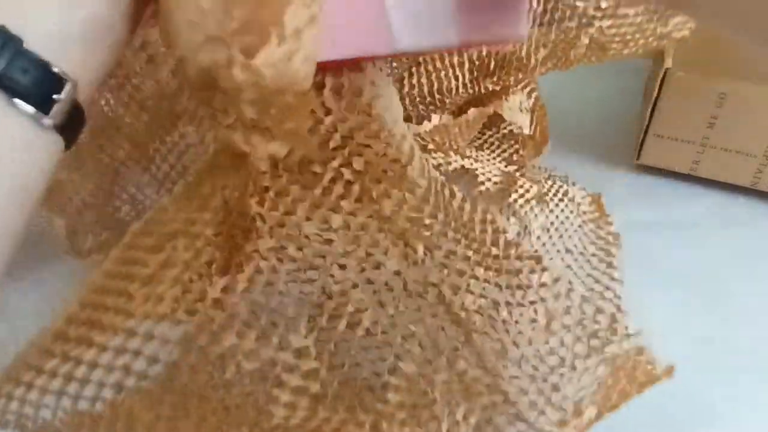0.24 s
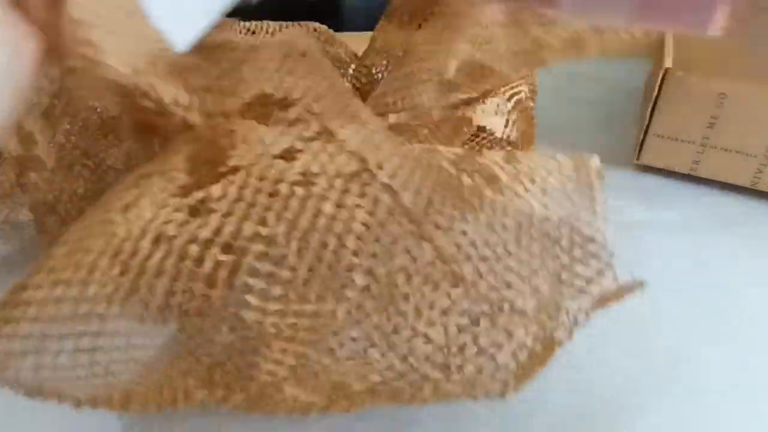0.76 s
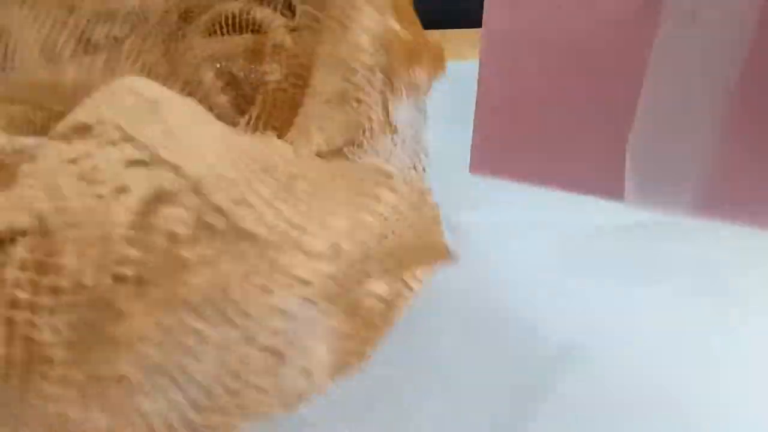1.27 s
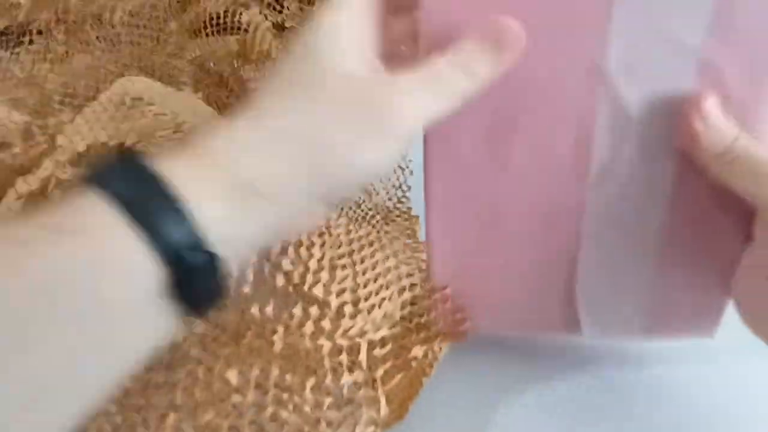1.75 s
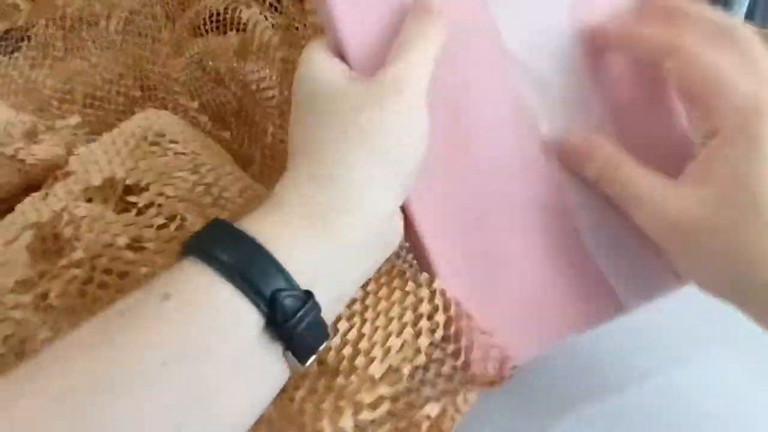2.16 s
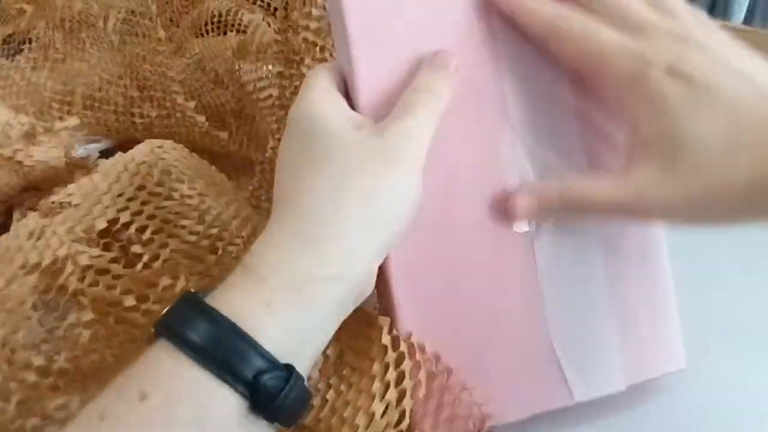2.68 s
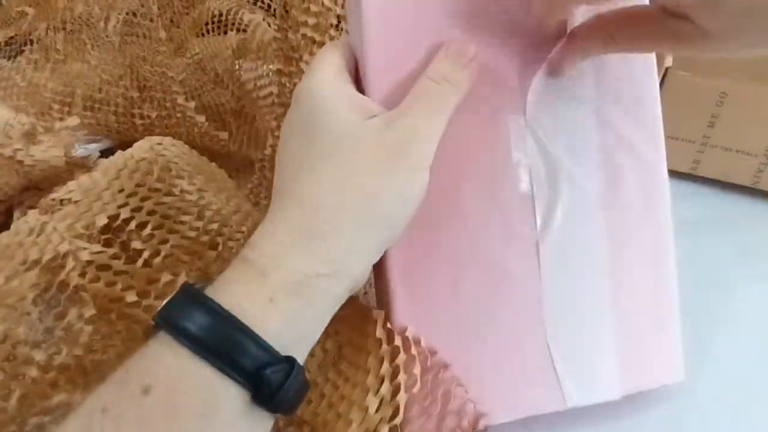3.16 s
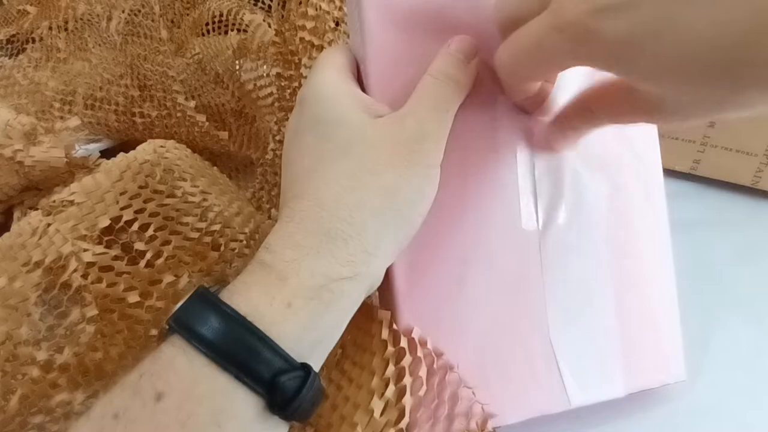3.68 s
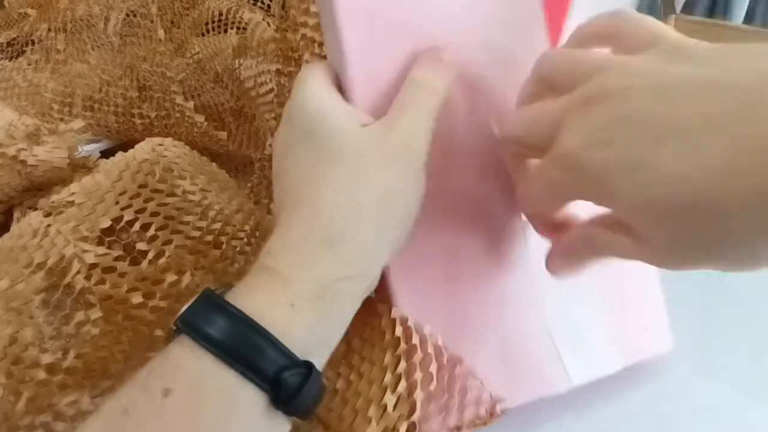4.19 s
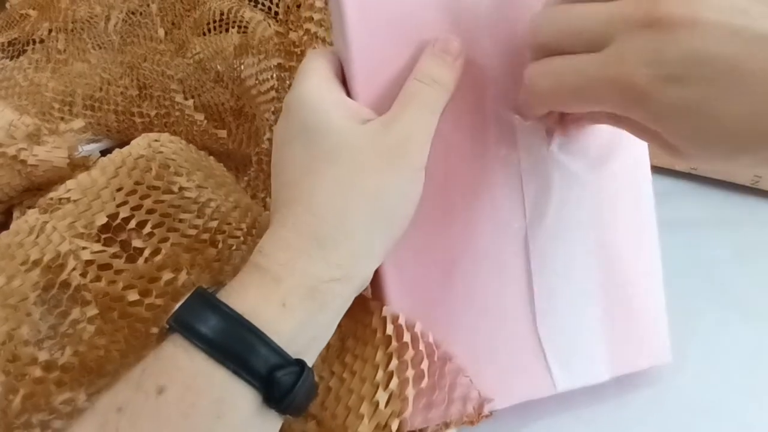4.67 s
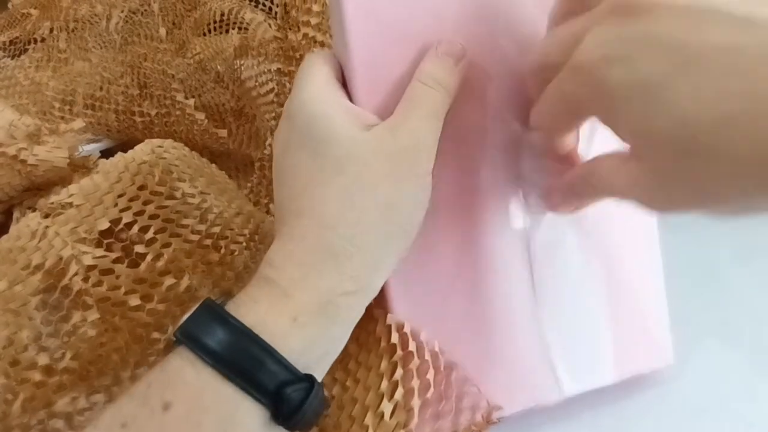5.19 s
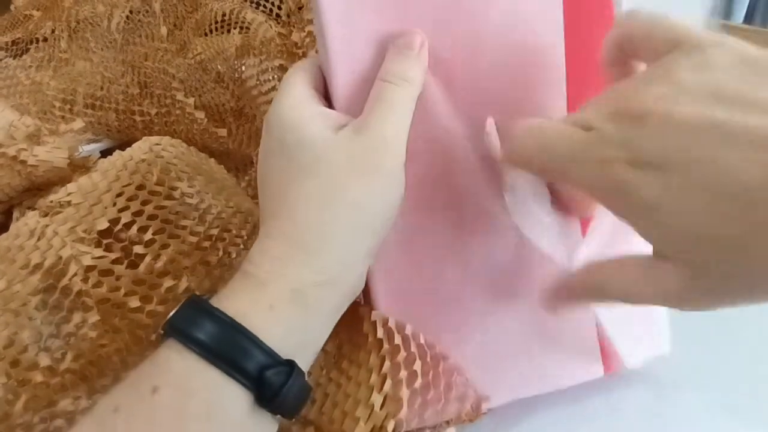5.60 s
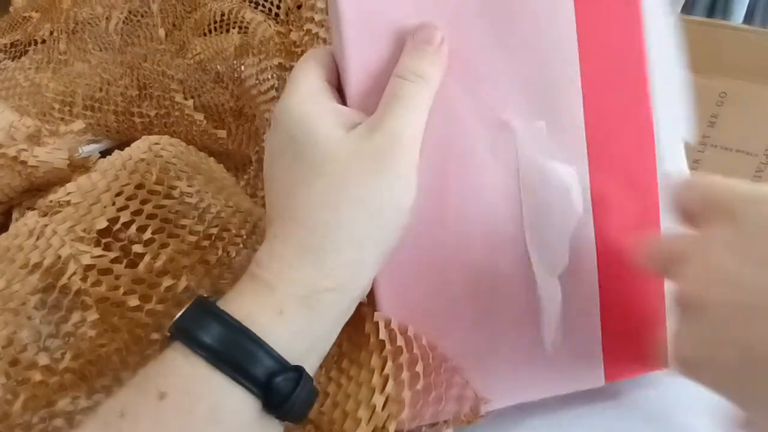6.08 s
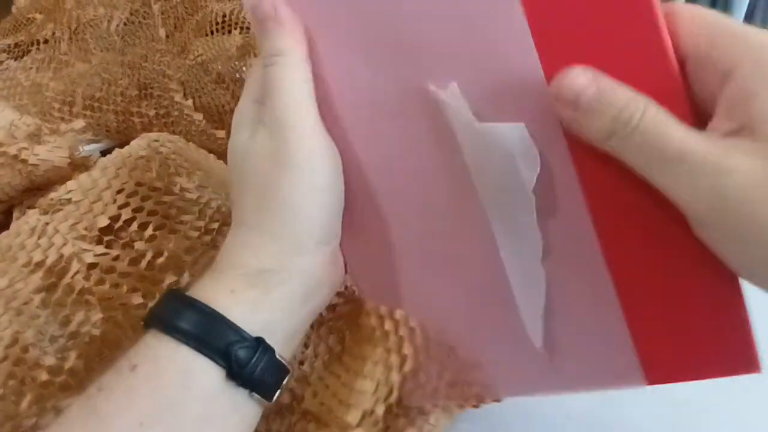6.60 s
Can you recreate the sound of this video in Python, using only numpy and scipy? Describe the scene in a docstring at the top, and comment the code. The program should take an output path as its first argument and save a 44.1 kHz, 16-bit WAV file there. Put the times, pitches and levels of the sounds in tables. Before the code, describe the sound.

Faint papery brushing and a soft thump give way to brittle tissue crinkling and ripping over a hollow cardboard box, ending in light finger rubs.

```python
"""Fingers pick at the taped tissue wrapping of a flat box and tear it open, pull by pull: random showers of
snapping fibres swell, slacken and die away, single creases pop as resonant noise bursts, and the hollow box drums along.
Before this the box is lifted out of honeycomb packing paper, a wider shower of snaps, and bumps softly onto a table.
Knocks, bumps and a tap on the card cover ring sets of modes; a phone close by in a small room hears it over faint hiss."""
import sys
import numpy as np
from scipy import signal
from scipy.fft import rfft, irfft
from scipy.io import wavfile
from scipy.ndimage import uniform_filter1d

SR = 44100
rng = np.random.default_rng(int(sys.argv[2]) if len(sys.argv) > 2 else 0)


def transcribe(u):
    """Save the signal u as a 16-bit wav file named by the first command-line argument.

    u: samples, shape (n,) or (channels, n), limited to [-1, 1]; the rate is SR.
    q: integer samples, one column per channel.
    """
    v = np.clip(np.atleast_2d(u).T, -1, 1)
    q = np.round(v * 32767).astype(np.int16)
    wavfile.write(sys.argv[1], SR, q)


N = 302071
TIME = np.arange(N) / SR

# Pulls and rubs at the tissue: (start [s], length [s], relative rustle level [dB], relative fibre fizz level [dB],
# relative box drumming level [dB], pitch of the taut span [Hz], its relative ring [dB])
PULLS = [(2.826, 0.056, -43.5, -63, -68, 1100, 13), (2.88, .085, -47, -52, -50, 4270, 13),
         (3.05, 0.16, -53, -54, -55.5, 3450, 7), (3.138, 0.012, -33, -40, -45, 5030, 0.5),
         (3.24, 0.035, -34.5, -55, -58, 4460, 3), (3.33, 0.079, -35.5, -51, -50, 4660, 7.5),
         (3.42, 0.048, -45, -66, -51.5, 3600, 10), (3.522, .18, -35.5, -57, -46, 3300, 12),
         (3.76, 0.11, -35.5, -49, -43.5, 2380, 3), (3.94, 0.17, -38, -48.5, -50, 4270, 3),
         (4.235, .15, -49, -70, -48, 1750, 13), (4.335, 0.048, -42, -67, -43.5, 3400, -3),
         (4.42, 0.097, -47, -75, -54.5, 2730, 19), (4.525, 0.037, -31.5, -38, -49, 3200, 5),
         (4.57, 0.12, -30, -45, -44, 2660, 0), (4.725, 0.08, -46, -69, -56.5, 2450, 9),
         (4.86, 0.021, -36.5, -56, -52, 2470, 6), (4.935, 0.13, -34.5, -55, -44.5, 2460, 4),
         (5.03, 0.12, -37.5, -40, -64, 4030, 7), (5.165, 0.045, -26, -34, -41, 5500, 9),
         (5.198, 0.062, -25.5, -32, -52, 3220, 2), (5.265, .15, -34, -48.5, -53.5, 5100, 3),
         (5.41, .18, -29.5, -41, -47, 2150, -0.5), (5.638, 0.06, -24, -31.5, -47.5, 4970, 5),
         (5.7, 0.05, -28, -38, -56, 1400, -10), (5.785, 0.15, -31.5, -37.5, -51, 2300, 2.5),
         (5.928, 0.059, -25, -42, -40.5, 940, 6.5), (6.03, 0.063, -45, -46.5, -56, 950, 15),
         (6.128, 0.026, -42, -47, -83, 1110, 7), (6.4, 0.053, -47, -51, -56.5, 3030, 1)]
# Spectral colour of tissue: (frequency [Hz], relative gain [dB])
TISSUE_COLOUR = [(40, -12), (100, -5), (200, -5), (420, -2), (560, -3.5), (960, 0), (1500, 1.5), (1750, 3),
                 (2200, 1.5), (2750, 0), (3250, -0.5), (4000, -1), (5600, 0.5), (7000, -2), (8400, -18.5),
                 (10500, -1.5), (11500, -8.5), (12800, -9), (15200, -11.5)]
# Loudest creases popping: (start of the strain [s], relative pop level [dB], relative fibre fizz level [dB],
# facet pitch [Hz], time scale of the burst [ms])
CREASES = [(.2483, -36, -36, 5790, 2), (0.4047, -25.5, -23, 6200, 6.7), (.946, -65, -33, 13700, 18),
           (1.621, -27.5, -32.5, 3830, 7.8), (1.995, -40.5, -39, 6400, 12), (2.828, -26.5, -52, 3270, 7.6),
           (2.8396, -24, -28.5, 5700, 2.9), (2.846, -25, -36, 3300, 4.1), (2.855, -26.5, -36, 4440, 6.8),
           (2.8739, -31.5, -31, 3410, 1.5), (2.934, -29.5, -23, 5360, 6.2), (3.07, -38, -36, 3500, 7.5),
           (3.104, -29.5, -24, 5630, 4.8), (3.2408, -21, -41, 5970, 3), (3.2461, -24, -35, 5200, 3.4),
           (3.2632, -21, -25, 5600, 2.9), (3.298, -27, -43, 3660, 3.2), (3.327, -22.5, -22, 4370, 2.8),
           (3.529, -22, -47, 4120, 2), (3.5347, -25, -48, 2510, 1.1), (3.571, -25.5, -39, 2310, 5.7),
           (3.705, -23.5, -24, 5460, 8.2), (3.746, -22, -25, 4500, 3.2), (3.765, -17.5, -26.5, 2360, 2.1),
           (3.811, -24, -47, 3950, 3.3), (3.826, -25, -34, 4270, 3.5), (3.835, -19.5, -25.5, 4840, 5.1),
           (3.889, -21.5, -54, 2340, 8.7), (3.896, -36, -49, 2400, 2.2), (3.9372, -15, -16.5, 2440, 6.8),
           (3.96, -30, -20.5, 5510, 2.8), (4.075, -21, -25, 3670, 2.9), (4.303, -30.5, -41, 3740, 1.7),
           (4.3125, -27.5, -46, 3500, 3.8), (4.3223, -31, -56, 3700, 2.4), (4.343, -21.5, -30, 3310, 6.8),
           (4.386, -32, -61, 3410, 0.75), (4.5342, -20, -23.5, 3170, 2.5), (4.5896, -18.5, -27, 2570, 1.6),
           (4.65, -24, -34, 2020, 4.4), (4.6682, -22, -32, 4030, 3.4), (4.6857, -23.5, -26, 3140, 2.1),
           (4.7516, -26.5, -30.5, 5500, 2.5), (4.9191, -16.5, -59, 2330, 5.1),
           (4.966, -18, -27.5, 2380, 3.4), (5.0307, -12.5, -14.5, 3710, 5.9), (5.0771, -21, -21, 6650, 3.7),
           (5.1326, -24.5, -21, 6600, 0.96), (5.225, -18.5, -25, 5660, 2.8),
           (5.2429, -20, -21.5, 5500, 5.9), (5.334, -21.5, -25, 5900, 2.4), (5.3655, -21, -25, 2080, 1.4),
           (5.3824, -20.5, -24, 6030, 1.8), (5.409, -22, -25, 2130, 3.1), (5.4402, -20.5, -23.5, 4600, 3.9),
           (5.4684, -19.5, -22, 1840, 3.2), (5.4915, -34, -23.5, 6700, 3.2),
           (5.523, -24.5, -25.5, 2000, 5.7), (5.5501, -20.5, -42, 3500, 1.5),
           (5.5808, -23.5, -30, 5500, 2.6), (5.7802, -18.5, -21.5, 5240, 2.5),
           (5.863, -20.5, -20, 5010, 2.4), (5.8755, -18.5, -14.5, 6820, 2.1),
           (5.934, -23.5, -20, 2310, 9.7), (6.1579, -25.5, -20.5, 5940, 5.1),
           (6.4951, -37, -33.5, 2880, 8.9)]
# Spectral colour of a crease: (frequency [Hz], relative gain [dB])
CREASE_COLOUR = [(200, 10), (600, -4), (1000, 2.5), (1700, 1), (2400, 3), (6000, 3), (8300, -8.5),
                 (10300, 4.5), (13300, -4), (15300, -5.5), (16800, -25)]
# Brushes against the honeycomb paper: (start [s], length [s], relative rustle level [dB],
# relative fibre fizz level [dB], relative box drumming level [dB], pitch of the taut span [Hz], its relative ring [dB])
BRUSHES = [(.03, 0.22, -44, -43, -50.5, 2870, 8), (.087, 0.071, -32.5, -31, -54, 4700, -2),
           (.2, 0.064, -38.5, -53, -62, 4240, 0), (.28, .16, -41, -41.5, -52, 3140, 3),
           (.56, 0.19, -54.5, -41.5, -72, 4260, 0.5), (.77, 0.078, -54, -47, -87, 2210, 11),
           (.83, 0.13, -57, -44, -92, 4300, 3), (.96, 0.086, -53.5, -43, -84, 1900, 14),
           (1.02, 0.15, -49, -41, -91, 3300, 3), (1.07, .09, -58, -54, -83, 1400, -9),
           (1.15, 0.12, -44.5, -39, -61.5, 825, 4), (1.435, 0.014, -62, -50, -50, 1100, -1),
           (1.617, 0.022, -38, -71, -35.5, 1700, 0), (1.745, 0.082, -59.5, -50.5, -52.5, 4300, 9),
           (1.935, 0.05, -55.5, -41, -75, 5540, 5), (2.005, 0.089, -57.5, -46, -77, 3500, 9),
           (2.17, 0.062, -65, -48, -56.5, 5000, 2)]
# Spectral colour of the honeycomb mesh: (frequency [Hz], relative gain [dB])
MESH_COLOUR = [(40, -10), (110, -17), (200, -3), (330, -7), (520, -9), (760, 2.5), (1250, -2), (2100, 2.5),
               (3300, 3.5), (5800, 7), (8200, -2.5), (9300, 7), (10500, 14.5), (13300, 10), (15200, 7.5)]
# Fingertips sliding over the box: (start [s], length [s], relative rustle level [dB],
# relative fibre fizz level [dB], relative box drumming level [dB], pitch of the rubbed span [Hz], its relative ring [dB])
RUBS = [(2.752, 0.021, -40, -39.5, -84, 3360, 11), (2.9, 0.16, -52.5, -68, -55, 980, 36),
        (3.033, 0.04, -46.5, -63, -79, 1070, 28), (6.49, 0.21, -50.5, -54.5, -74, 2900, 6),
        (6.715, 0.15, -39.5, -43, -84, 2570, 9), (6.19, 0.46, -60.5, -51.5, -68, 3000, 0)]
# Modes of the card cover at pitch 1: (frequency [Hz], relative level [dB], t60 [s])
COVER_MODES = [(636, 9.5, 0.051), (1822, 6.5, 0.12), (2740, 4, 0.11), (3040, 16, 0.085), (4100, -3, .05),
               (724, -2.5, 0.11)]
# Fingers knocking on the box: (time [s], relative level [dB], pitch [multiple of the box's modes])
KNOCKS = [(1.444, -27.5, 1.06), (1.631, -30.5, 1.0), (2.282, -41.5, 1.05), (3.036, -37.5, 1.0),
          (3.248, -30.5, 1.0), (3.297, -31.5, 1.0), (3.478, -33.5, 1.0), (3.94, -29, .8),
          (4.167, -28.5, 1.05), (4.179, -30, 1.05), (5.033, -29, .92), (5.655, -27, .85),
          (6.411, -45, 1.05)]
# Modes of the hollow box at pitch 1: (frequency [Hz], relative level [dB], t60 [s])
BOX_MODES = [(233.5, -15, 0.19), (330, 4, 0.023), (358, 3.5, 0.068), (395, 1, 0.089), (440, 0.5, 0.016),
             (903, -11, 0.063), (860, -10, 0.088)]
# The box set down on the table: (time [s], relative level [dB], pitch [Hz])
BUMPS = [(2.375, -24.5, 90.6), (2.438, -31.5, 73)]
# Modes of the box lying on the table: (frequency [multiple of the bump's pitch], relative level [dB], t60 [s])
TABLE_MODES = [(.43, -15, 0.96), (.78, -13, 0.74), (1, 10, 0.16), (1.219, -14, 0.52)]
# The gripped box swaying under the pulls: (time of the height [s], relative level [dB], pitch [Hz], swell [ms])
THUDS = [(4.437, -39.5, 56, 17), (4.643, -34, 125, 7), (4.685, -31.5, 77.5, 9.7), (4.752, -36, 71.5, 20),
         (4.833, -41, 111, 15), (4.931, -32.5, 108, 8.3), (5.53, -37, 88, 15), (5.644, -31, 208, 6.1),
         (5.744, -34.5, 90, 9.4), (5.85, -37, 90, 13), (5.876, -32, 101, 7.9), (5.948, -36.5, 78, 17),
         (5.953, -36, 165, 16), (5.987, -36, 95, 15)]
# Spectral colour of the steady noise: (frequency [Hz], relative density [dB per Hz])
HISS_COLOUR = [(25, 17.5), (90, 13), (200, 7.5), (400, -17), (700, -44), (2500, -15), (5000, 4), (8000, -1),
               (10000, -30), (11400, 17), (13000, -13), (15200, -42)]
# Spectral colour of the microphone: (frequency [Hz], relative gain [dB])
MIC_COLOUR = [(11500, 0.5), (13800, -14.5), (14500, 0.5), (15500, 2), (16200, -24)]

STRAIN_S = .0007  # a crease strains this long before it gives way
COVER_TAP_S, COVER_TAP_DB = 6.496, -31
FIZZ_HZ = 8000  # rustle lies below, fibre fizz above
TOP_HZ = 16200
PORT_LAG_S = .00088  # the sound reaches the right microphone first


def tissue():
    """Brittle fracture: thin paper rips in a dense shower of fibres, with runs of small dry ticks."""
    gains, span = strokes(PULLS, swell=0.18, slack_db=4.0, release_s=0.035, rest_db=[-75, -64, -83])
    fibres = ports(snaps(per_s=5000, spread_db=2.0, decay_ms=0.45), likeness=0.035)
    crumple = fibres * stick_slip(depth_db=1.8, per_s=99)
    ticks = slips(per_s=260, jitter=.8, spread_db=2.8, facet_hz=3290, decay_ms=1.0)
    ticks = ports(ticks, likeness=0.2)
    tick_db = -4.5  # relative to the crumple
    shower = unit(crumple) + undb(tick_db) * unit(ticks)
    shower = flex(shower, span, span_width=0.39, patchy_db=3.5, patch_hz=75.4, patch_s=0.013)
    sound = rustle(shower, gains, TISSUE_COLOUR, rustle_db=0.7, fizz_db=5.5, drum_db=5.0)
    return balance(sound, left_db=0.27, right_db=-0.27)


def creases(pop_db=-4.0, fizz_db=-4.0, facet_db=3.0, ring_per_db=0.75, facet_q=14, bass_share=0.39,
            rise_share=.45, fade_share=0.46, ragged=0.47, size=1400):
    """Buckling: a crease gives way and rings the facet beside it, purer the less it fizzes, high ones with less bass."""
    out = np.zeros((2, N))
    ms = TIME[:size] * 1000
    window = np.sqrt(.008 * SR / size)  # refers the levels to rms over 8 ms
    for s, db, fibre_db, hz, scale_ms in CREASES:
        progress = ms / scale_ms
        envelope = (1 - np.exp(-progress / rise_share)) * np.exp(-progress / fade_share)
        jerks = np.exp(ragged * np.repeat(rng.standard_normal(size // 20), 20))
        noise = ports(rng.standard_normal((2, size)) * envelope * jerks, likeness=0.21)
        burst = colour(noise, CREASE_COLOUR)
        ring_db = facet_db + ring_per_db * np.clip(db - fibre_db, 0, 20)
        burst = burst + undb(ring_db) * signal.lfilter(*signal.iirpeak(hz, facet_q, SR), burst)
        # a small, high facet radiates little bass
        burst = signal.lfilter(*signal.butter(1, hz * bass_share, "high", fs=SR), burst)
        body = unit(band(burst, FIZZ_HZ, "low")) * undb(db + pop_db)
        fizz = unit(band(burst, FIZZ_HZ, "high")) * undb(fibre_db + fizz_db)
        add(out, s + STRAIN_S, (body + fizz) * window)
    return balance(out, left_db=1.35, right_db=-1.35)


def honeycomb():
    """Stick-slip friction: slit cells brush over each other, wide across the table; some snag and flick free."""
    gains, span = strokes(BRUSHES, swell=0.28, slack_db=5.0, release_s=0.018, rest_db=[-73, -62, -85])
    brushing = snaps(per_s=2600, spread_db=1.0, decay_ms=1.0) * stick_slip(depth_db=3.0, per_s=40)
    snags = slips(per_s=110, jitter=.9, spread_db=8.5, facet_hz=5050, decay_ms=1.0)
    snag_db = -11  # relative to the brushing
    shower = unit(brushing) + undb(snag_db) * unit(snags)
    shower = flex(shower, span, span_width=0.28, patchy_db=3.2, patch_hz=109, patch_s=0.029)
    sound = rustle(shower, gains, MESH_COLOUR, rustle_db=2.5, fizz_db=2.5, drum_db=-0.5)
    return balance(sound, left_db=-0.5, right_db=0.5)


def cover(ring_db=-10):
    """Friction and impact on a plate: fingertips slide over the box, a thumb taps its card cover, and its modes ring."""
    gains, span = strokes(RUBS, swell=0.27, slack_db=11.5, release_s=0.086, rest_db=[-100] * 3)
    grain = ports(snaps(per_s=3500, spread_db=1.5, decay_ms=0.55), likeness=0.11)
    scrape = flex(grain, span, span_width=0.23, patchy_db=6.5, patch_hz=80, patch_s=0.079)
    out = rustle(scrape, gains, TISSUE_COLOUR, rustle_db=1, fizz_db=2.0, drum_db=1)
    out = out + unit(convolve(grain, ring(COVER_MODES))) * gains[0] * undb(ring_db)
    tap = undb(COVER_TAP_DB) * blow(COVER_MODES, 0.94, contact_ms=0.041, lowest_hz=400)
    add(out, COVER_TAP_S, ports([tap, tap], likeness=0.67))
    return out


def box():
    """Modal excitation: knocks ring the hollow box, bumps ring it on the table; gripped, it only sways in brief thuds."""
    knocks, bumps = np.zeros((2, N))
    for s, db, pitch in KNOCKS:
        add(knocks, s, undb(db) * blow(BOX_MODES, pitch, contact_ms=0.26, lowest_hz=245 * pitch))
    for s, db, hz in BUMPS:
        add(bumps, s, undb(db) * blow(TABLE_MODES, hz, contact_ms=1.07, lowest_hz=35.0))
    t = TIME[:SR // 5] - .1  # zero at the height of the thud
    for s, db, hz, swell_ms in THUDS:
        swell_s = swell_ms / 1000
        sway = np.sin(2 * np.pi * (hz * t + rng.random())) * np.exp(-(t / swell_s) ** 2)
        judder = unit(band(rng.standard_normal(len(t)), 2 * hz, "low"))
        judder = judder * np.exp(-(t / (2 * swell_s)) ** 2) / 4
        add(bumps, s + t[0], undb(db) * (sway + judder))
    low_sounds = balance(ports([bumps, bumps], likeness=1), left_db=-3.5, right_db=0.5)
    return ports([knocks, knocks], likeness=0.36) + low_sounds


def room(x, early_db=-9, early_s=0.07, late_db=-13, late_t60_s=0.27, dull_hz=7000):
    """Reverberation: two exponentially decaying noise tails, one short and one longer, both dulled and thinned in the bass."""
    t = TIME[:SR // 2]
    arrival = np.clip((t - .003) / .004, 0, 1)  # reflections set in from 3 to 7 ms

    def tail(t60):
        return unit(rng.standard_normal((2, len(t))) * arrival * undb(-60 * t / t60))

    early, late = tail(early_s), tail(late_t60_s)
    response = (undb(early_db) * early + undb(late_db) * late) / np.sqrt(len(t))
    response = signal.lfilter(*signal.butter(1, dull_hz, fs=SR), response)
    return x + convolve(x, band(response, 184, "high"))


def hiss(level_db=-63.5):
    """Stationary noise: faint room noise and microphone hiss, shaped from white noise."""
    return unit(colour(rng.standard_normal((2, N)), HISS_COLOUR)) * undb(level_db)


def rustle(shower, gains, points, rustle_db, fizz_db, drum_db):
    """Coupled radiation: snaps sound through the sheet and fizz at its fibres; irregular tugs shake the box beneath."""
    sheet_gain, fizz_gain, drum_gain = gains
    sound = colour(shower, points)
    sheet = unit(band(sound, FIZZ_HZ, "low")) * sheet_gain * undb(rustle_db)
    fizz = unit(band(sound, FIZZ_HZ, "high")) * fizz_gain * undb(fizz_db)
    tugs = ports(snaps(per_s=300, spread_db=3.0, decay_ms=0.7), likeness=0.71)
    drumming = unit(band(convolve(tugs, ring(BOX_MODES)), 1870, "low"))
    return sheet + fizz + drumming * drum_gain * undb(drum_db)


def strokes(rows, swell, slack_db, release_s, rest_db):
    """Addition of powers: strokes swell, slacken and die away over a resting level; the loudest sets the taut span.

    Returns the gains of rustle, fizz and drumming, then the span's pitch (log2 Hz) and ring (dB)."""
    t = TIME[::20]
    power = undb(rest_db)[:, None] ** 2
    span, weight = 0, 0
    for start, length, *db, hz, ring_db in rows:
        age = t - start
        progress = np.clip(age / max(length, .005), 0, 1)
        attack = np.minimum(progress / max(swell, .01), 1)
        release = np.exp(-np.clip((age - length) / release_s, 0, 20))
        energy = (attack * undb(-slack_db * progress) * release) ** 2
        power = power + undb(db)[:, None] ** 2 * energy
        loudness = energy * undb(db[0]) ** 2 + 1e-18
        span = span + np.outer([np.log2(hz), ring_db], loudness)
        weight = weight + loudness
    gains = [np.interp(TIME, t, gain) for gain in np.sqrt(power)]
    return gains, [np.interp(TIME, t, control) for control in span / weight]


def snaps(per_s, spread_db, decay_ms, size=160):
    """Random impulses: a shower of tiny snaps, many weak and few strong, each a brief decaying noise."""
    count = int(per_s * N / SR)
    starts = rng.integers(0, N, count)
    strength = undb(spread_db * np.minimum(rng.exponential(size=count), 4))
    fade = np.exp(-TIME[:size] / (decay_ms / 1000))
    grains = rng.standard_normal((2, count, size)) * strength[:, None] * fade
    return scatter(starts, grains)


def slips(per_s, jitter, spread_db, facet_hz, decay_ms, size=200):
    """Stick-slip release: taut paper lets go in an uneven run of dry ticks; each rings a different little facet."""
    draws = rng.standard_normal((int(2 * per_s * N / SR), 4))
    gap, strength, octave, turn = np.clip(draws, -2, 2).T
    starts = (np.cumsum(np.exp(jitter * gap)) * SR / per_s).astype(int)  # 1 / per_s is the median gap
    t = TIME[:size]
    pitch_hz = facet_hz * 2 ** (octave[:, None] / 2)
    facets = np.sin(2 * np.pi * (pitch_hz * t + turn[:, None]))
    grains = rng.standard_normal((2, len(starts), size)) + facets
    grains = grains * undb(spread_db * strength)[:, None] * np.exp(-t / (decay_ms / 1000))
    return scatter(starts, grains)


def scatter(starts, grains):
    """Superposition: sum the grains of both channels at their start samples."""
    places = (starts[:, None] + np.arange(grains.shape[-1])).ravel()
    return np.array([np.bincount(places, g.ravel(), N)[:N] for g in grains])


def stick_slip(depth_db, per_s):
    """Stick-slip friction: paper moves in fits and starts, a gain that jumps between random levels."""
    hold = max(int(SR / per_s), 1)
    steps = np.repeat(np.clip(rng.standard_normal(N // hold + 1), -2, 2), hold)[:N]
    return undb(depth_db * uniform_filter1d(steps, hold // 3 + 1))


def flex(x, span, span_width, patchy_db, patch_hz, patch_s, size=512):
    """Resonance of a bending sheet: a taut span favours one pitch (width in octaves), narrow resonances come and go."""
    overlap = size * 3 // 4
    hz, t, frames = signal.stft(x, SR, nperseg=size, noverlap=overlap)
    patches = rng.standard_normal(frames.shape[1:])
    for axis, spread in enumerate((patch_hz / hz[1], patch_s / t[1])):
        kernel = signal.windows.gaussian(41, spread)
        patches = signal.fftconvolve(patches, np.expand_dims(kernel, 1 - axis), "same")
    octave, ring_db = (np.interp(t, TIME, control) for control in span)
    distance = (np.log2(np.maximum(hz, 1))[:, None] - octave) / span_width
    gain = undb(ring_db / (1 + distance ** 2) + patchy_db * np.clip(unit(patches), -2, 2))
    sheet = hz < FIZZ_HZ
    gain[sheet] /= np.sqrt(np.mean(gain[sheet] ** 2, axis=0))  # rms gain 1 in the rustle range
    return signal.istft(frames * gain, SR, nperseg=size, noverlap=overlap)[1][:, :N]


def blow(modes, pitch, contact_ms, lowest_hz):
    """Impact: a soft push rings the modes, and little is radiated below the lowest one; peak 1."""
    t = TIME[:SR // 20]
    push = t * np.exp(-t / (contact_ms / 1000))
    sound = band(signal.fftconvolve(ring(modes, pitch), push), lowest_hz, "high")
    return sound / np.abs(sound).max()


def ring(modes, pitch=1):
    """Modal superposition: the velocity response to a tap is a sum of decaying cosines."""
    t = TIME[:SR]
    return sum(undb(db - 60 * t / t60) * np.cos(2 * np.pi * hz * pitch * t) for hz, db, t60 in modes)


def ports(pair, likeness, alike_hz=1400):
    """Partial coherence: two microphones share some of the vibration and the bass; the left one hears it later."""
    share = np.clip(likeness, 0, 1)
    right = pair[1]
    left = share * right + np.sqrt(1 - share ** 2) * pair[0]
    left = left + signal.lfilter(*signal.butter(1, alike_hz, fs=SR), right - left)
    late_left = np.pad(left, (int(PORT_LAG_S * SR), 0))[:len(left)]
    return np.array([late_left, right])


def balance(x, left_db, right_db):
    """Level difference between the ears: a gain for each channel."""
    return x * undb([[left_db], [right_db]])


def colour(x, points, size=2048):
    """Minimum-phase filtering: a folded cepstrum gives a causal response through (Hz, dB) points."""
    hz, db = np.transpose(points)
    grid = np.maximum(np.fft.rfftfreq(size, 1 / SR), 1)
    cepstrum = irfft(np.log(undb(np.interp(np.log(grid), np.log(hz), db))))
    cepstrum[1:size // 2] *= 2
    cepstrum[size // 2 + 1:] = 0
    return convolve(x, irfft(np.exp(rfft(cepstrum))))


def convolve(x, response):
    """Linear response: pass both channels through an impulse response."""
    return signal.fftconvolve(np.atleast_2d(x), np.atleast_2d(response), axes=-1)[:, :x.shape[-1]]


def band(x, hz, kind):
    """Band limiting: steep low-pass or high-pass."""
    return signal.sosfilt(signal.butter(8, hz, kind, fs=SR, output="sos"), x)


def add(out, s, sound):
    """Superposition: mix a sound in at time s."""
    start = max(int(s * SR), 0)
    out[..., start:start + sound.shape[-1]] += sound[..., :N - start]


def unit(x):
    """Normalization: scale to rms 1."""
    return x / np.sqrt(np.mean(x ** 2))


def undb(db):
    """Logarithmic level: decibels to amplitude gain."""
    return 10 ** (np.asarray(db) / 20)


def scene():
    """Superposition: paper and box sound together in the room, over steady hiss."""
    sources = tissue() + creases() + honeycomb() + cover() + box()
    return room(sources) + hiss()


def record(dry):
    """Transducer response: the phone colours the highest treble, rounds the sharpest peaks and cuts the top."""
    ceiling = .85
    rounded = ceiling * np.tanh(colour(dry, MIC_COLOUR) / ceiling)
    return signal.sosfilt(signal.ellip(8, .2, 70, TOP_HZ, fs=SR, output="sos"), rounded)


dry = scene()
out = record(dry)
transcribe(out)
```